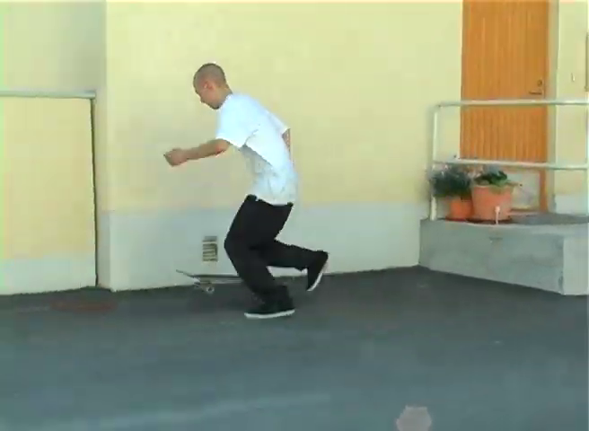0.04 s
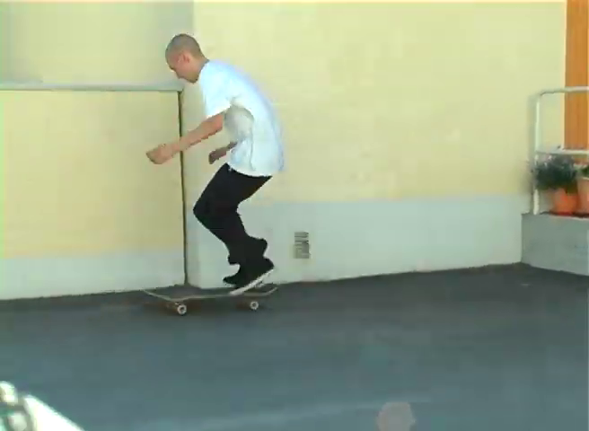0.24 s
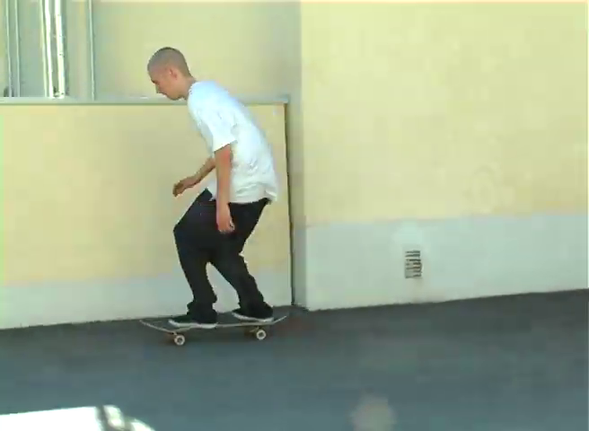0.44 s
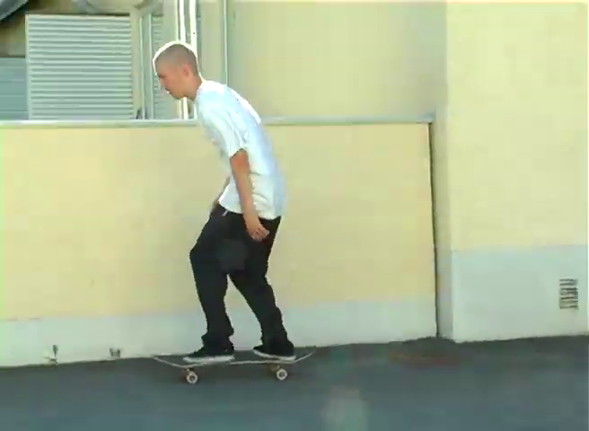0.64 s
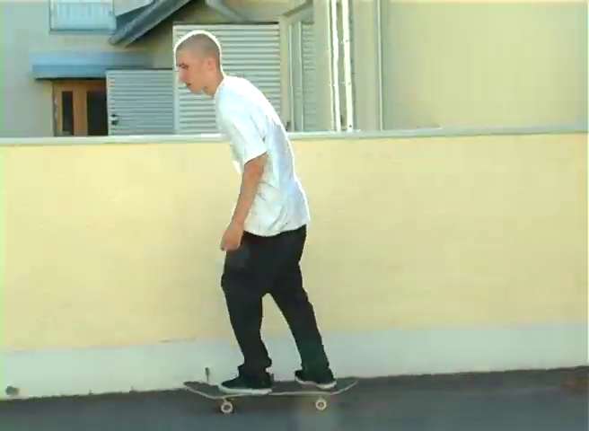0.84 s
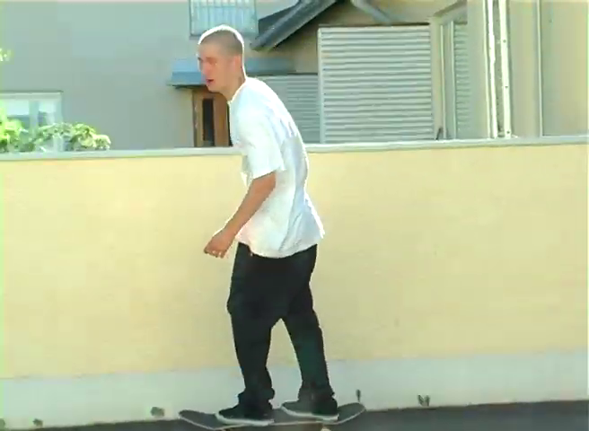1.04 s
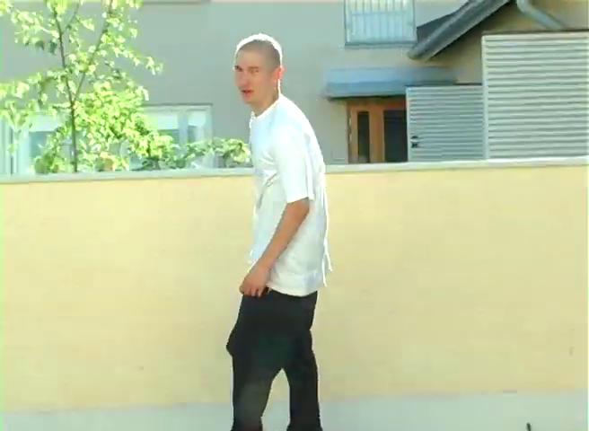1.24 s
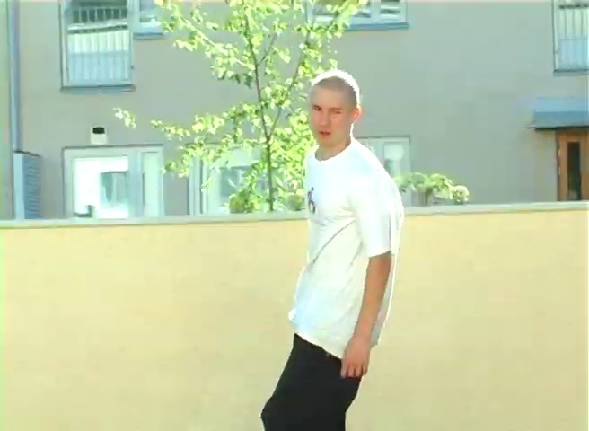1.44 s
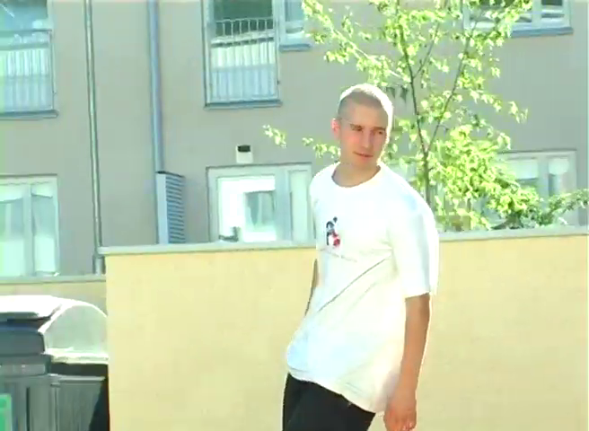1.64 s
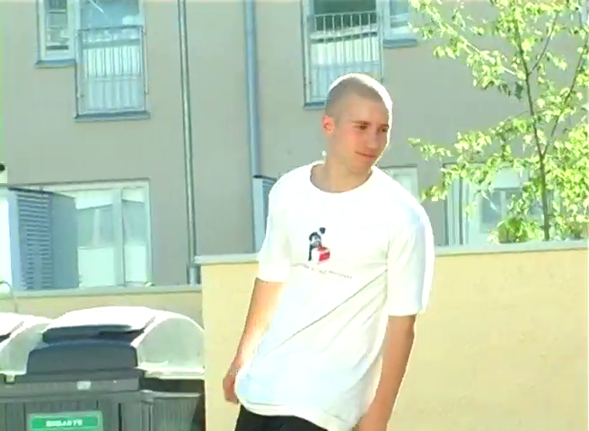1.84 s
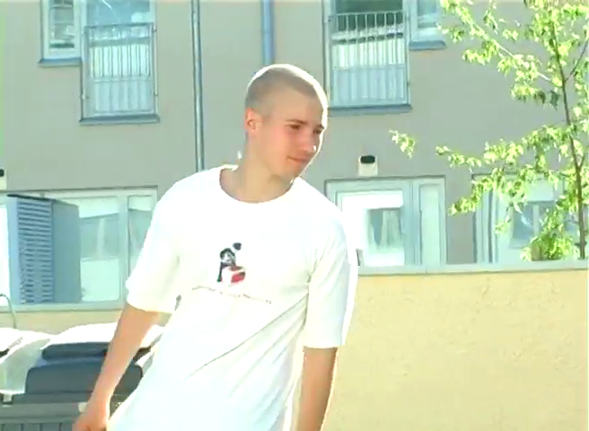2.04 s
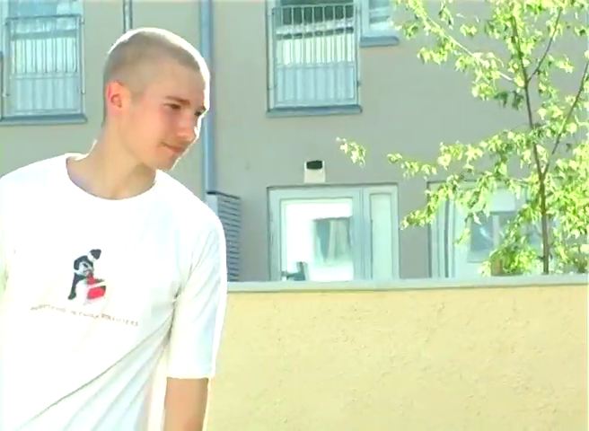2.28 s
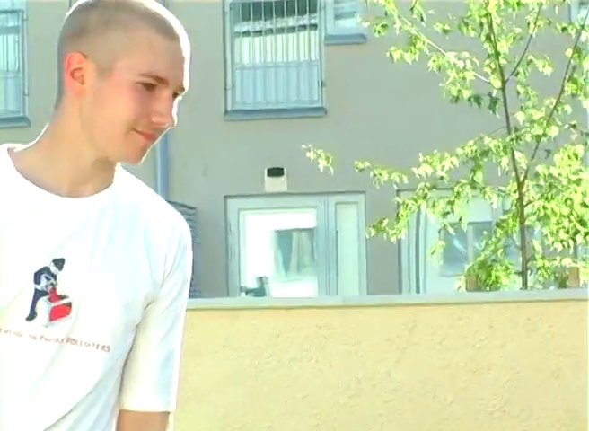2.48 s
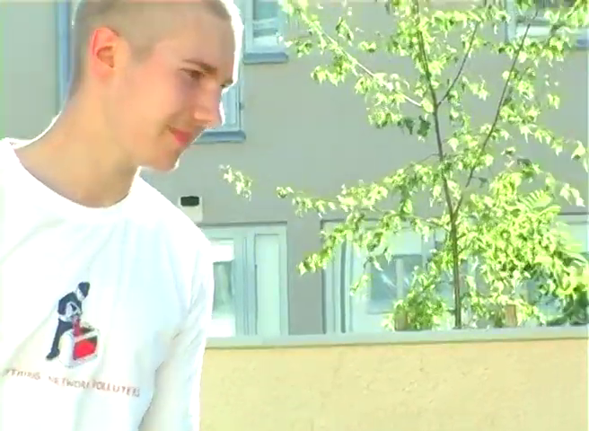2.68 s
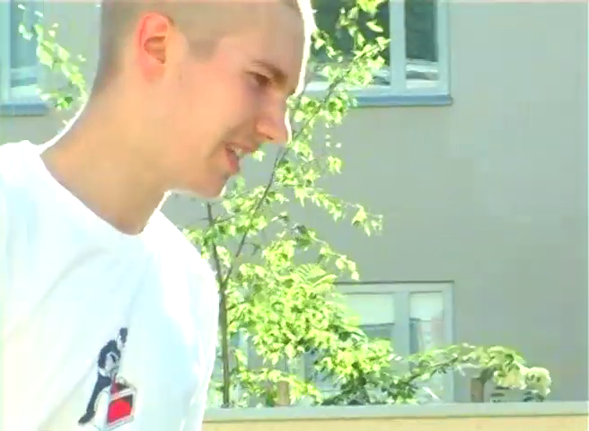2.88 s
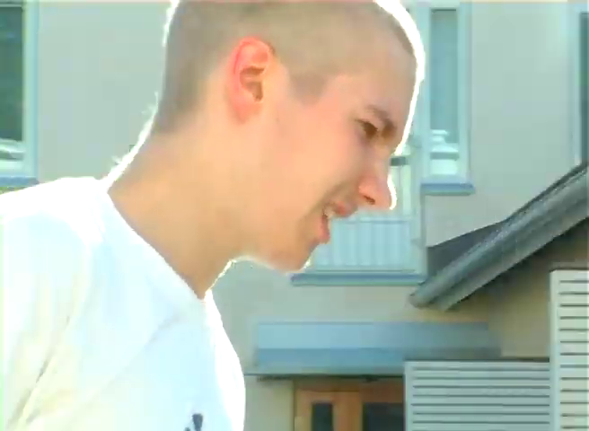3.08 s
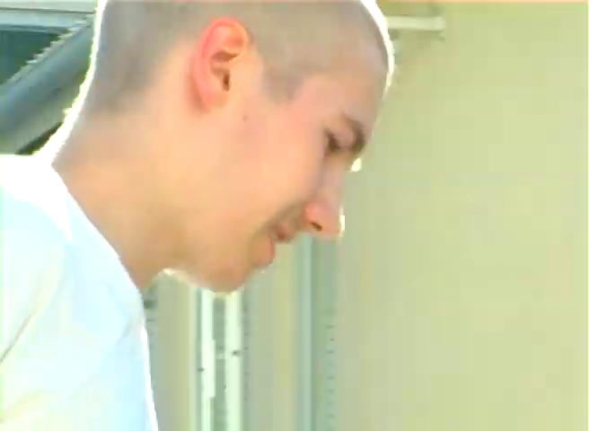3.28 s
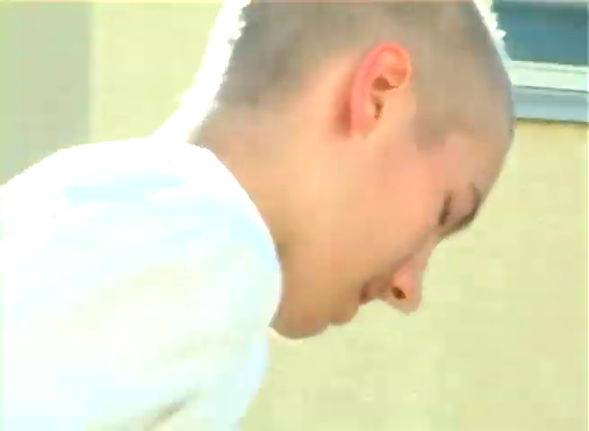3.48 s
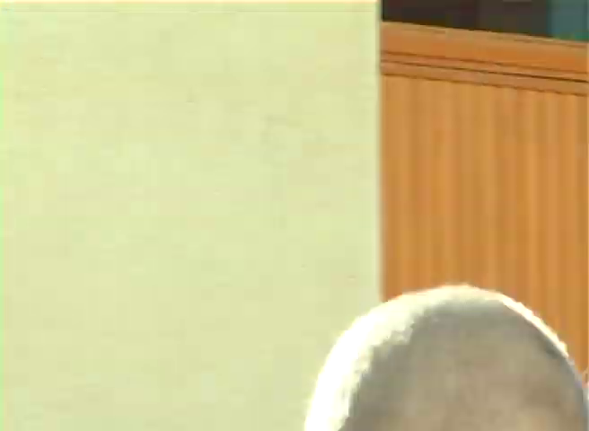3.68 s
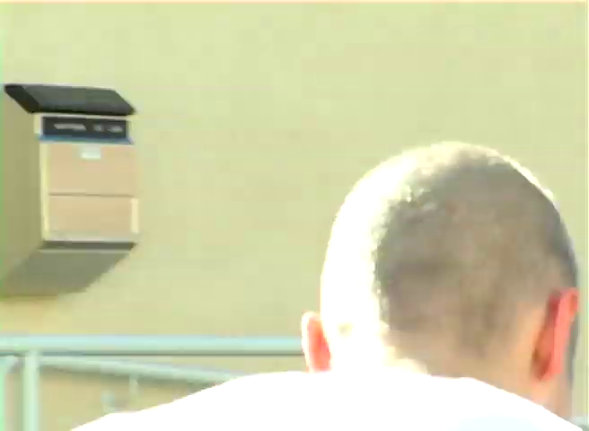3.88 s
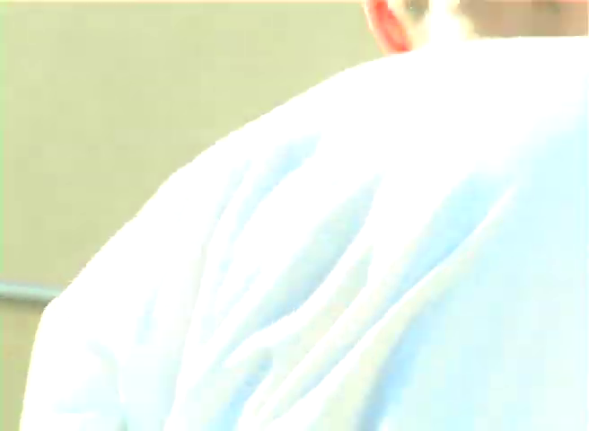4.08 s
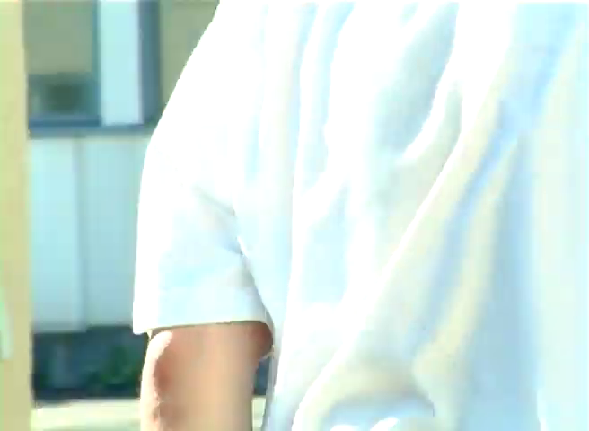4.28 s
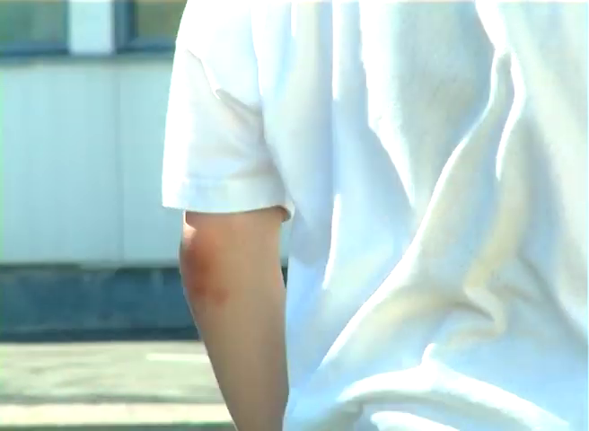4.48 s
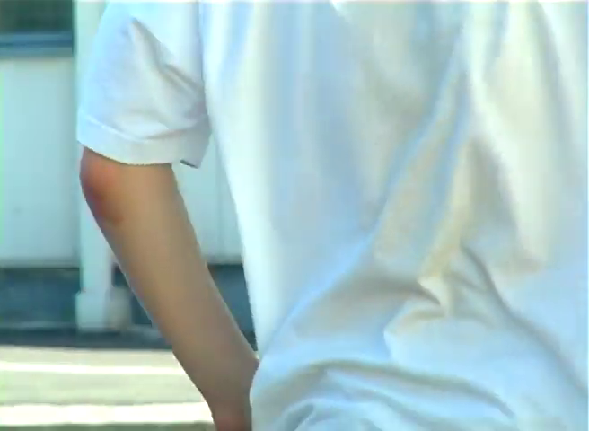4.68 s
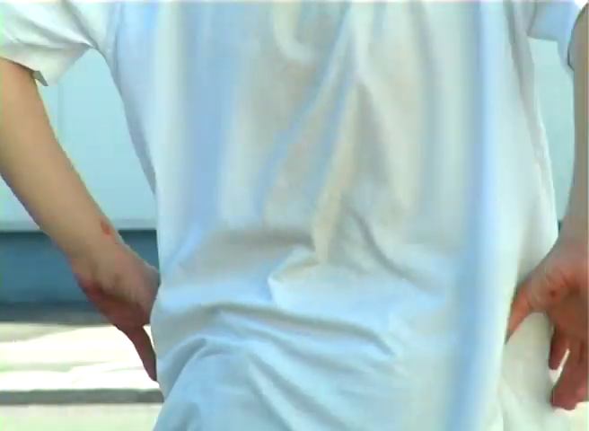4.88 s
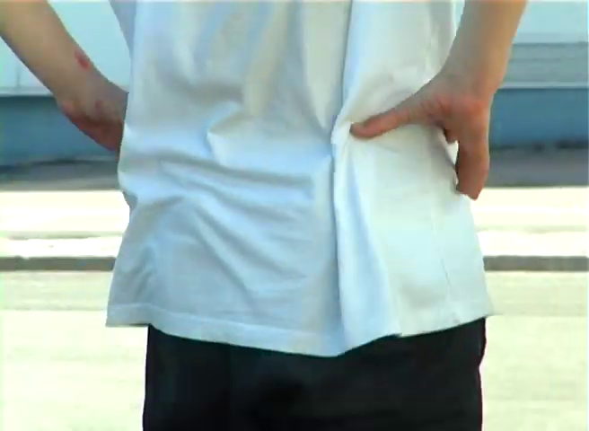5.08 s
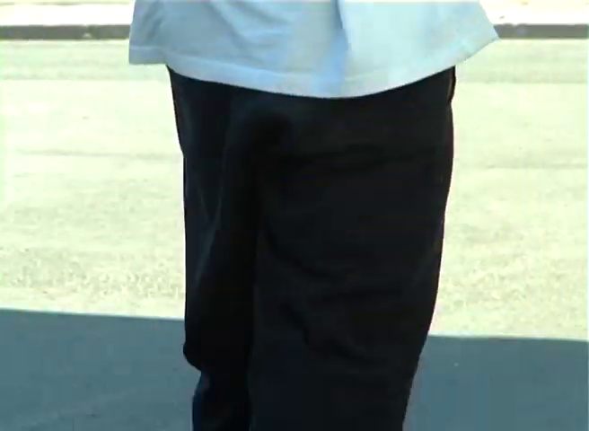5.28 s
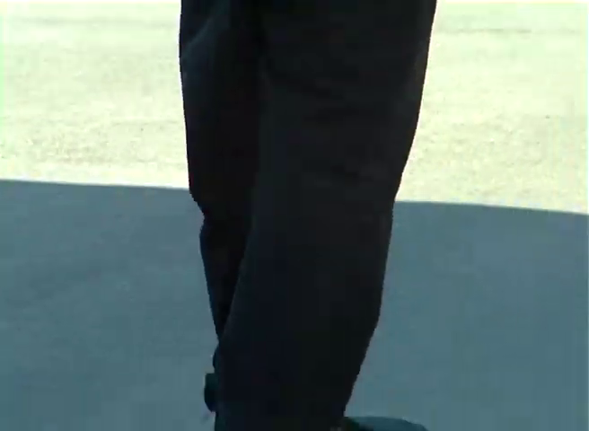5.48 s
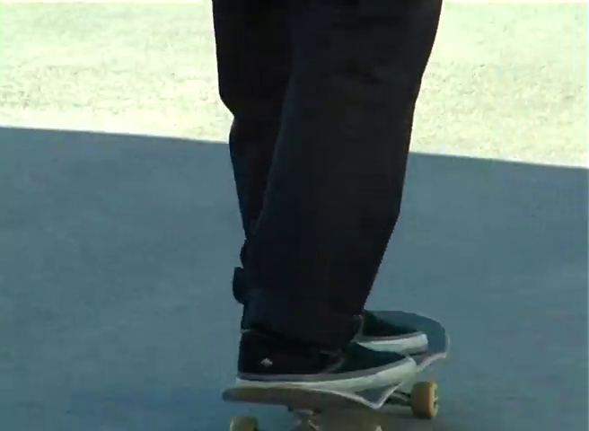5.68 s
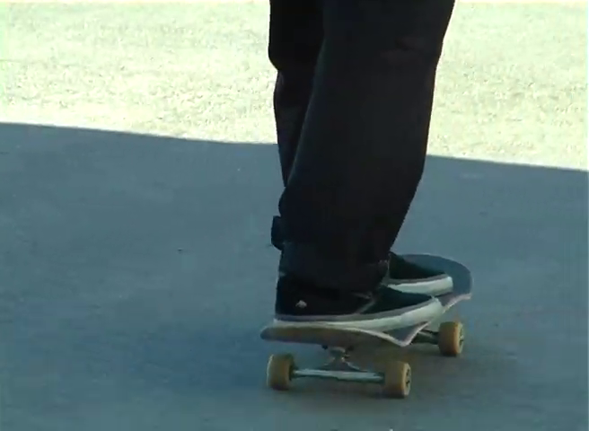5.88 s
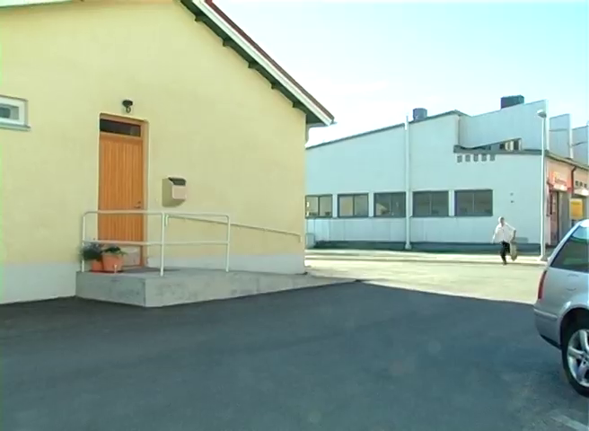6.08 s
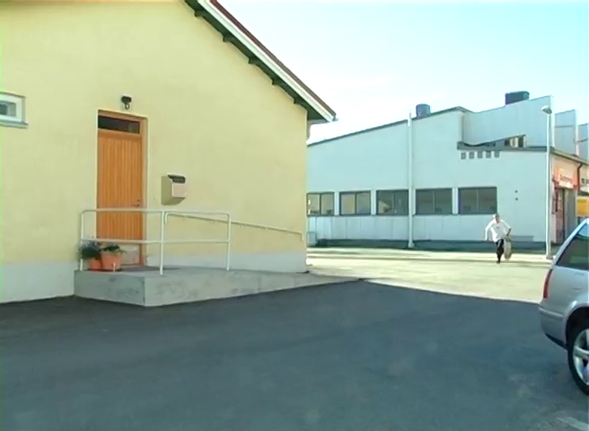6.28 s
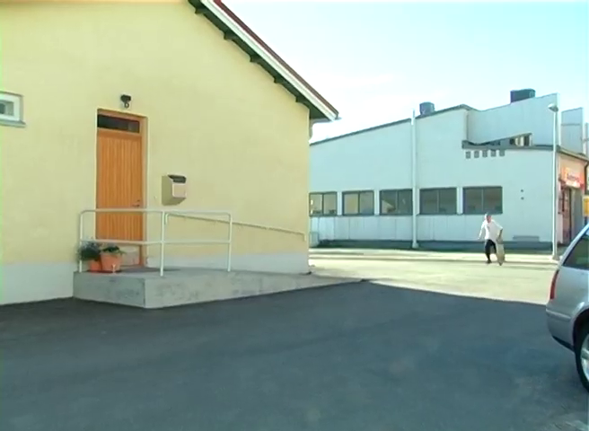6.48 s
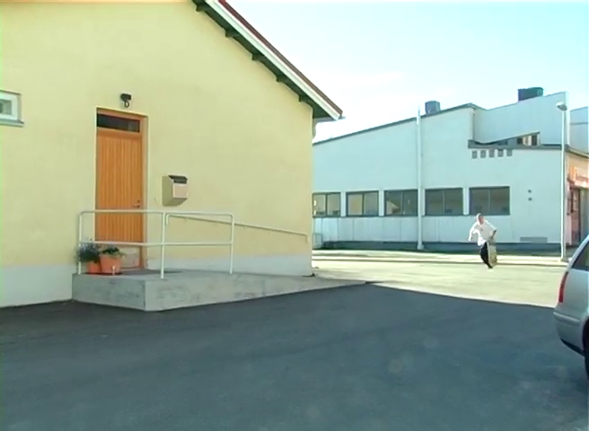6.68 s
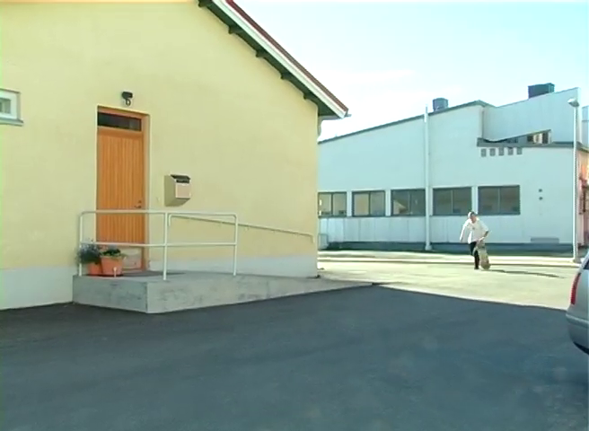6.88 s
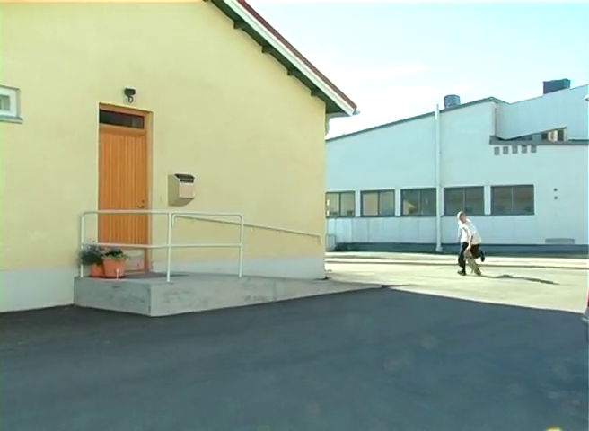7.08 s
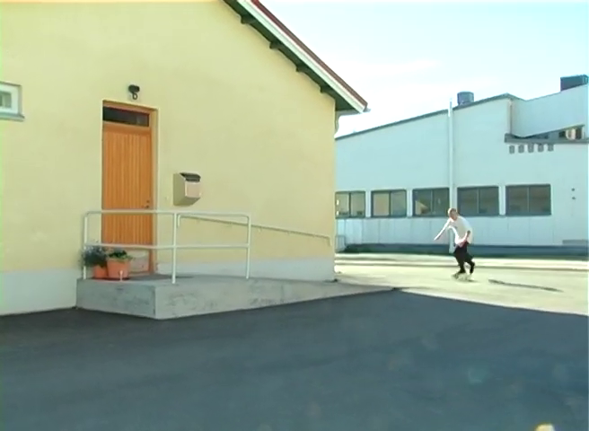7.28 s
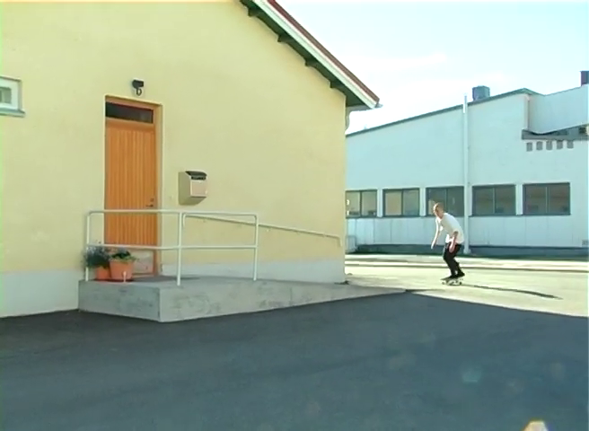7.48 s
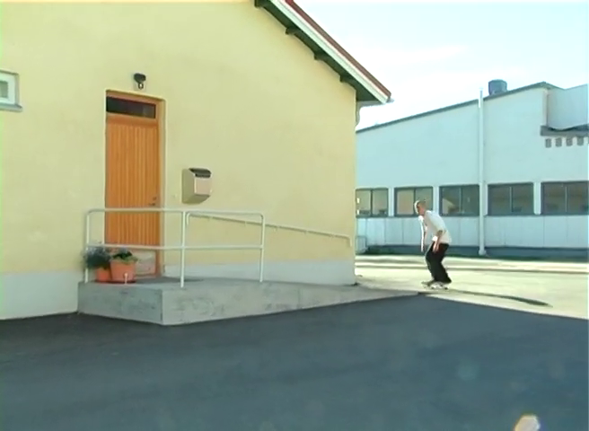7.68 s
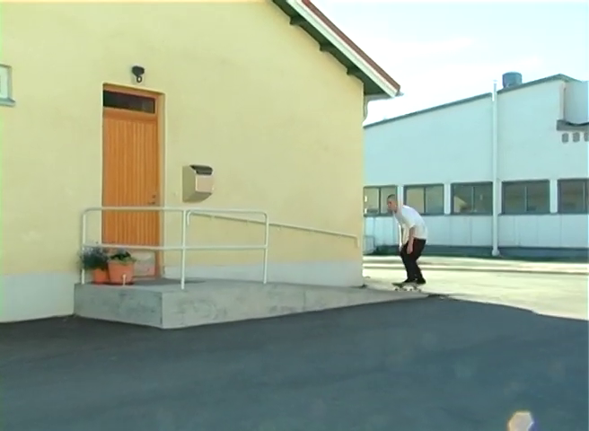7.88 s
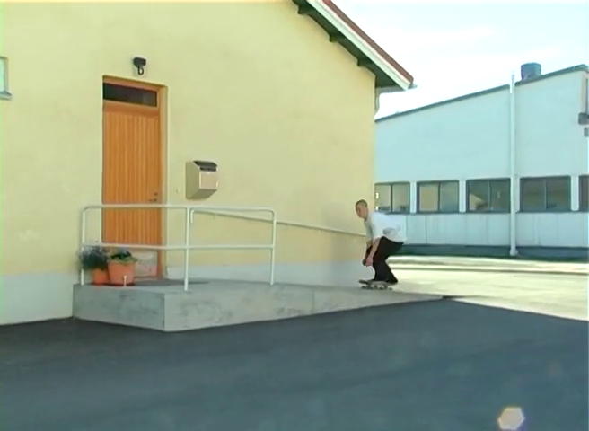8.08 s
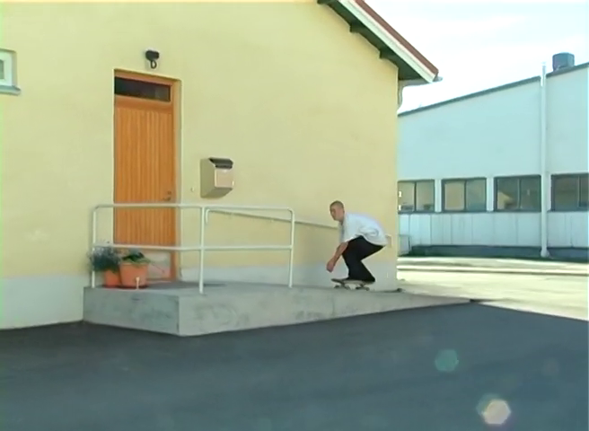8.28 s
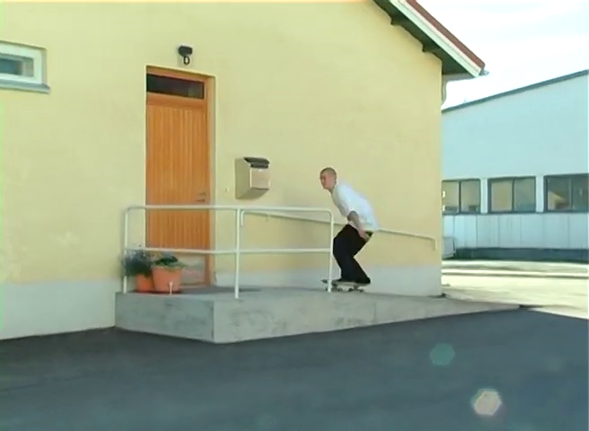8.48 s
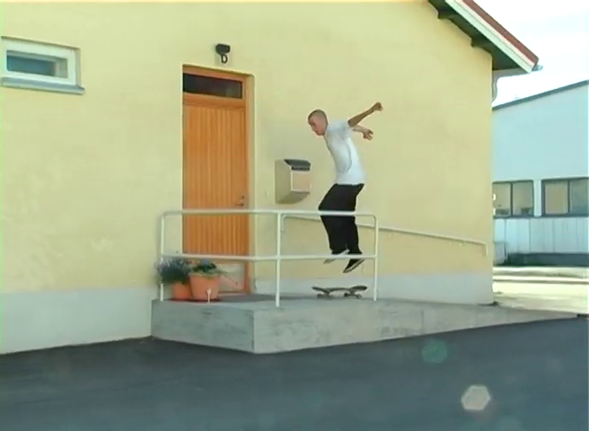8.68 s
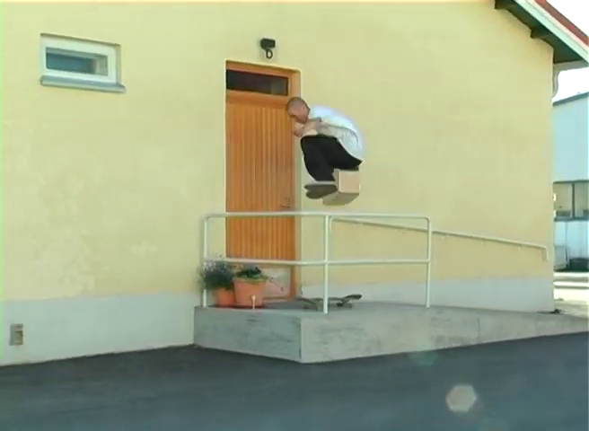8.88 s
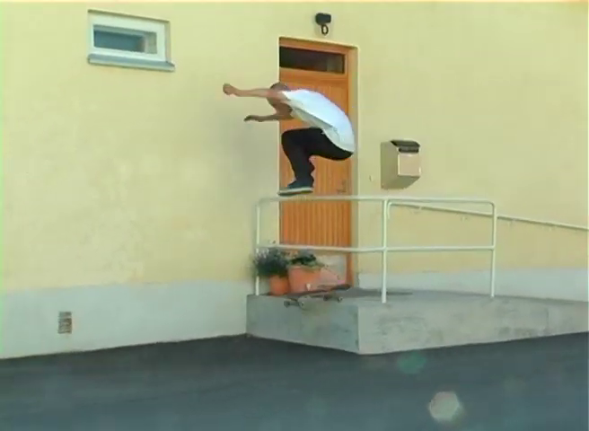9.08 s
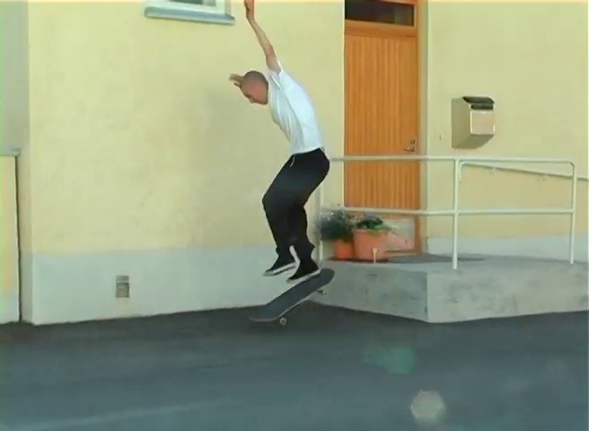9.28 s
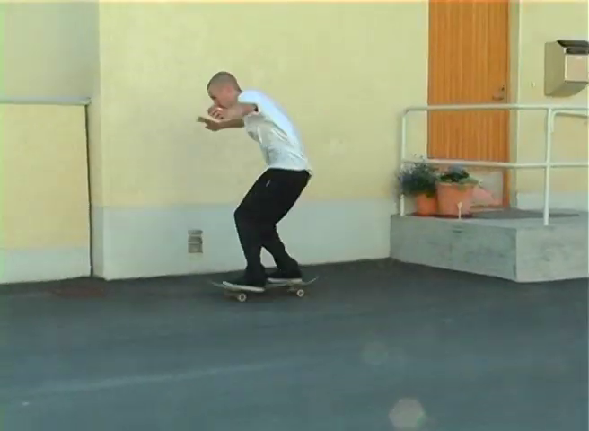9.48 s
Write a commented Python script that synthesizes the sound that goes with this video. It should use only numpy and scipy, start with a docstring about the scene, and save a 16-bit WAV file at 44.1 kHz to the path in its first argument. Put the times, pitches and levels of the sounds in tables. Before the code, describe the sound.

A skateboard clatters, rolls close past over rough asphalt, then rolls up again from afar and lands a jump hard.

```python
"""A skateboard in a yard, over the steady hum of distant traffic. First the rider jumps on, and house
walls echo the clatter. Rough asphalt shakes the deck (the wooden board) and crackles under the wheels
as he rolls close past and away. At 6 seconds the rolling stops suddenly. After a quiet moment he drops
the board far off and rolls up. He jumps, the board runs on alone, and at 9.4 seconds he lands on it hard."""
import sys
import numpy as np
from scipy import signal
from scipy.fft import rfft, irfft, next_fast_len
from scipy.io import wavfile
from scipy.ndimage import map_coordinates

SR = 44100
rng = np.random.default_rng(int(sys.argv[2]) if len(sys.argv) > 2 else 0)


def output_pcm(signal):
    """Save a mono or channel-first signal as 16-bit PCM at the path in sys.argv[1].

    Samples are clipped to [-1, 1] before scaling.
    """
    pcm = np.clip(np.atleast_2d(signal).T, -1, 1) * 32767
    wavfile.write(sys.argv[1], SR, np.round(pcm).astype(np.int16))


N = 420713
TIME = np.arange(N) / SR

# Where the board is. Each row: time in seconds, closeness in steps
# (-2 far end, -1 across the yard, 0 a little way off, 1 near, 2 right below the listener).
CLOSENESS = [(1.2, 0.21), (2.4, 0.85), (3.15, 1.7), (3.7, 2.2), (4.0, 1.18), (5.0, 0.58), (6.0, 0.37),
             (6.1, -2.2), (7.4, -1.37), (8.7, -0.97), (9.4, 1.18)]
# When the wheels roll. Each row: start, end and fade time, all in seconds.
ROLLS = [(0, 6.012, .004), (7.39, 9.18, .045), (9.43, 9.54, .045)]
# How hard the asphalt shakes the board. Each row: time in seconds, level in dB.
SHAKE_FIRST_PASS = [(0.0, -33.5), (0.34, -40), (0.47, -37.5), (0.88, -37.5), (1.42, -32), (2.57, -31.5),
                    (3.08, -34.5), (3.5, -36.5), (3.88, -31), (3.98, -32.5), (4.9, -36), (5.09, -38.5),
                    (5.45, -40), (5.83, -37), (5.88, -37)]
SHAKE_RUN_UP = [(7.48, -40.5), (7.576, -36), (7.866, -35), (8.562, -41.5), (8.702, -41), (9.046, -44),
                (9.15, -43.5)]
SHAKE_AFTER_LANDING = [(9.43, -42), (9.54, -38)]
# The jump. Each row: time in seconds, how empty the board is (0 ridden, 1 alone).
RIDER_OFF = [(8.66, 0.055), (8.72, 0.57), (9.38, 0.78), (9.41, 0.12)]
# Brief swells and dips in the roll. Each row: middle in seconds, length in seconds, change in dB.
WEIGHT_SHIFTS = [(0.11, 0.17, -31), (2.92, 0.078, -1), (3.22, 0.19, 1), (3.63, 0.22, -12.5),
                 (4.65, .3, 4.5)]  # the rider presses down or lifts
SIDEWAYS_SCRUBS = [(0.25, 0.28, 6.5), (2.05, .75, 4.5), (2.82, 0.51, 5.5), (3.98, 1, 5.5), (5.35, 0.3, 3.5)]  # the wheels slide sideways
COARSE_GROUND = [(3.49, 0.22, 4.5), (3.77, 0.12, 3), (5.12, 0.025, 6.5), (5.28, 0.068, 3), (7.88, 0.095, 3),
                 (9.1, 0.11, 4.5)]  # rougher asphalt makes the deck surge

# Tone colours of the steady sounds. Each row: frequency in Hz, relative level in dB.
DECK_ACROSS_YARD = [(260, -12), (310, -7.5), (400, -1.5), (490, 2), (570, -2.5), (670, -3.5), (750, -11),
                    (860, -13), (970, -1.5), (1100, -8.5), (1220, -21), (1300, -8), (1430, -23),
                    (1550, -14), (1720, -26), (1920, -19), (2200, -47)]
DECK_MIDWAY = [(300, -12), (420, 4), (505, 3), (570, 1), (650, -4.5), (750, -13.5), (870, -3.5),
               (985, -4.5), (1080, -8.5), (1200, -20.5), (1280, -6), (1410, -13), (1540, -8), (1740, -18.5),
               (1890, -8), (2200, -38.5)]
DECK_NEAR = [(180, -30.5), (300, -5.5), (408, -1.5), (491, 3.5), (547, 5), (594, -4), (673, 0), (872, -11),
             (948, 0.5), (1050, 3.5), (1140, -3), (1230, -7), (1630, -7.5), (2130, -18.5), (2200, -36),
             (2860, -49), (4840, -120)]
DECK_FROM_ABOVE = [(180, -52), (300, -13), (363, -9), (422, -11), (507, 1.5), (599, -3), (662, 2), (702, 3),
                   (872, -21), (1050, -7.5), (1210, -10.5), (1300, -8), (1640, -20), (1970, -12),
                   (2200, -35), (2860, -64), (4840, -120)]
DECK_EMPTY = [(300, -3), (370, -37), (440, 4), (500, 3), (580, -4), (660, 2.5), (730, -22.5), (800, 1),
              (880, -15), (990, -10.5), (1220, -13.5), (1700, -35), (2200, -26)]
AIR_BOOM = [(70, -30), (110, -5.5), (150, -7.5), (185, -3.5), (230, 1.5), (265, -2.5), (310, -15),
            (380, -26.5)]
AIR_BOOM_NEAR = [(70, -32), (105, -13), (135, -3), (170, 1), (215, -1.5), (255, 2.5), (310, -12),
                 (380, -23)]
CRACKLE_FAR = [(1600, -23.5), (2000, 0.5), (2250, -0.5), (2650, 2.5), (3000, -1.5), (3400, 3.5), (3900, -5),
               (4500, -12.5), (5500, -9)]
CRACKLE_NEAR = [(1600, -17), (2200, -4), (2700, 0), (3300, 1), (4000, 1), (4600, -3.5), (5300, -4),
                (7000, -12)]
BEARING_HISS = [(4000, -15), (5200, -2.5), (5800, 3), (6300, 2), (7200, -5), (7800, -2.5), (8600, -4.5),
                (9500, -12.5), (10200, -12), (11200, -17.5), (12300, -7), (14000, -10.5), (16000, -22.5)]
TRAFFIC = [(12, -58), (20, -21), (57, -5.5), (76, -11), (103, -10.5), (147, -19.5), (217, -9.5),
           (302, -16.5), (377, -16.5), (433, -17.5), (774, -21.5), (889, -24), (1930, -33.5), (4200, -48),
           (15000, -55)]
# High notes of the maple layers. Each row: pitch in Hz, level in dB, seconds to fade by 60 dB.
PLY_NOTES = [(1360, -8.5, 0.04), (1620, -1, 0.067), (1887, -1, 0.1), (1840, -3, 0.072), (2300, -12, 0.11),
             (2447, 2, 0.1), (2633, 5, 0.031), (2890, -2, 0.05), (3110, -12, 0.027), (3450, 7, 0.03),
             (3756, 3.5, 0.05)]
# A motor's hum and a thin whine. Each row: pitch in Hz, level in dB.
STEADY_TONES = [(75.4, -64), (15624, -74)]

# Blows to the board. Each row: start in seconds, level in dB, rattle length in seconds.
FOOT_THUDS = [(0.022, -26.5, 0.011), (0.508, -32, 0.0096), (3.039, -15.5, 0.0075), (3.266, -29, 0.015),
              (3.314, -21.5, 0.0093), (3.46, -30, 0.012), (9.43, -14, 0.0033), (9.467, -20.5, .015),
              (9.513, -21.5, 0.0098)]  # feet and weight come down on the deck and axles
WOOD_SLAPS = [(0.062, -32, 0.016), (6.675, -59, 0.0085), (6.951, -58, .008), (7.184, -22.5, 0.019),
              (7.261, -24, 0.015), (9.363, -28.5, 0.012)]  # bare wood hits the ground
LANDING = [(9.379, -11.5, 0.008), (9.387, -12.5, 0.017), (9.407, -6.5, 0.011), (9.421, -13, .007)]  # the axles come down, then both feet
# Wheels drop or hit a crack.
# Each row: start in seconds, level in dB, extra brightness in dB, rattle length in seconds.
WHEEL_CLACKS = [(0.158, -24.5, 10, .016), (0.183, -17, 5.5, 0.027), (0.328, -22, 4, 0.021),
                (0.398, -10.5, -3.5, .011), (0.412, -20, 1.5, .008), (0.751, -28, -4.5, 0.0063),
                (3.651, -18.5, -4, 0.0079), (3.714, -14.5, 2.5, .009), (3.724, -24, 6, .012),
                (3.803, -18.5, -1, .008), (3.997, -27.5, 6, .006), (5.615, -28, 2, .005),
                (5.63, -26, 3.5, 0.019), (5.781, -25.5, 0, .007), (5.899, -22, -2, .02),
                (7.383, -27.5, 8, .006), (7.389, -20, -1, .034), (7.727, -33, -5, 0.013),
                (7.974, -22, -1, 0.027), (8.049, -24.5, -1.5, 0.016), (8.791, -38.5, 7.5, 0.011)]
# Low notes of the struck deck. Each row: multiple of its pitch, level in dB, seconds to fade by 60 dB.
DECK_NOTES = [(1.002, 5, 0.2), (1.27, -20, 0.2), (1.8, -4.5, 0.077), (2.0, -28, 0.02), (2.3, 1.5, 0.026)]
# Tone colours of a blow's noise. Each row: frequency in Hz, relative level in dB.
WOOD_KNOCK = [(280, -33.5), (420, -3), (520, 5), (660, 3), (780, -5.5), (1000, 2), (1250, -12.5),
              (1600, -40.5)]
WOOD_CRACK = [(800, -4), (1300, 2), (1700, -0.5), (1950, 3), (2250, -1), (2900, -1.5), (3400, 2),
              (3900, -9.5), (4500, -21), (6000, -17)]
METAL_CLICK = [(3500, -40), (4500, -3.5), (5200, -8), (6200, 4.5), (7200, -4), (8400, -1.5), (9600, -10.5),
               (11200, -14), (12600, -6.5), (14200, -10), (16000, -29)]
# The walls' echo. Each row: frequency in Hz, seconds to fade by 60 dB.
ECHO_TIMES = [(200, 0.78), (1000, 0.49), (4000, 0.35), (12000, 0.064)]
# Small stones snap under a wheel. Each row: start in seconds, level in dB.
STONE_SNAPS = [(0.273, -28), (0.5896, -33), (0.6372, -23.5), (1.3109, -22.5), (2.515, -17.5), (5.4151, -28),
               (8.868, -30), (9.135, -40)]
# Sound from the far end loses its highest treble in the air. Each row: frequency in Hz, gain in dB.
FAR_END_TONE = [(3500, 5), (7000, 5), (10000, -10), (15000, -18)]
# How alike the two ears' signals are. Each row: frequency in Hz, likeness (1 is identical).
STEREO_LIKENESS = [(100, 0.99), (500, 0.98), (1000, 0.92), (2000, 0.89), (4000, 0.87), (8000, 0.72),
                   (13000, 0.66)]
# The balance of the two sides. Each row: frequency in Hz, left level minus right level in dB.
STEREO_BALANCE = [(60, -2.5), (110, -2.0), (200, -1.5), (380, -2.0), (700, -1.5), (1290, -1.5),
                  (2380, -1.0), (4400, -1.5), (8120, -1.5), (15000, -3.5)]

# Loudness rules for the roll. Each lists: base level in dB, dB per dB of shaking,
# dB per step closer, dB added when the board is empty.
DRONE_RULE = (-33.5, 1, 0.5, -5.5)
BOOM_RULE = (-45, -0.07, 6.5, -17)
HISS_RULE = (-53, 0.54, 1.4, 6.5)
# Recipes for the blows. Each lists, in relative dB: air thump, deck, wood crack, metal.
WHEEL_MIX = (-18.5, -0.5, -9, -14)
THUD_MIX = (-3, -1, -12.5, -26)
SLAP_MIX = (-16, -8, -2, -20)
LANDING_MIX = (-10.5, 0.5, -5.5, -15)

EASY_ROLL_DB = -35.5  # the shaking at an easy pace
DRONE_PER_LOAD, HISS_PER_LOAD, CRACKLE_PER_SCRUB = 0.26, 0.3, 0.17  # dB per dB
DECK_HZ, OVERHEAD_RISE_HZ, PITCH_SCATTER = 511.4, 126, 0.059  # the deck rings higher heard from above
TRAFFIC_DB, TRAFFIC_SWAY_DB = -49, 0.8
PEAK_LIMIT, TOP_HZ = 0.85, 16000


def amp(db):
    """Turn decibels into a number to multiply by."""
    return 10 ** (np.asarray(db) / 20)


def unit(x):
    """Scale a signal so its average strength (rms) is 1."""
    return x / np.sqrt(np.mean(x ** 2) + 1e-20)


def along(points, hz):
    """Read a table of frequencies and values, sliding between rows by musical pitch."""
    freqs, values = np.transpose(points)
    return np.interp(np.log(hz + 1), np.log(freqs + 1), values)


def wobble(rate):
    """A smooth curve through `rate` random values a second."""
    return map_coordinates(rng.standard_normal(int(N * rate / SR) + 4), [TIME * rate])


def swells(rows):
    """A dB curve with one smooth hill or dip for each row."""
    return sum(db * np.exp(-(2 * (TIME - s) / length) ** 2) for s, length, db in rows)


def closeness_at(s):
    """How close the board is at s seconds."""
    return np.interp(s, *np.transpose(CLOSENESS))


def filtered(x, response):
    """Multiply each frequency in x by response(hz)."""
    n = x.shape[-1]
    size = next_fast_len(n + 4096)
    return irfft(rfft(x, size) * response(np.fft.rfftfreq(size, 1 / SR)), size)[..., :n]


def coloured(x, spectrum, size=4096):
    """Give x a table's tone colour, falling steeply outside the table's range."""
    hz = np.fft.rfftfreq(size, 1 / SR) + 1
    edges = np.minimum(1, hz / spectrum[0][0]) ** 3 * np.minimum(1, spectrum[-1][0] / hz) ** 3
    cepstrum = irfft(np.log(amp(along(spectrum, hz)) * edges + 1e-6))
    # folding this in half makes the filter ring after a hit, never before it
    cepstrum[1:size // 2] *= 2
    cepstrum[size // 2 + 1:] = 0
    tap_response = irfft(np.exp(rfft(cepstrum)))
    return signal.fftconvolve(x, tap_response[None], axes=1)[:, :x.shape[-1]]


def stereo(pair):
    """Turn two unrelated signals into left and right, most alike in the bass."""
    angle = lambda hz: np.arccos(np.clip(along(STEREO_LIKENESS, hz), -1, 1)) / 2
    mid, side = filtered(pair, lambda hz: np.array([np.cos(angle(hz)), np.sin(angle(hz))]))
    return np.array([mid + side, mid - side])


def add(track, s, sound):
    """Mix a sound into the track, starting at s seconds."""
    part = track[:, max(0, round(s * SR)):][:, :sound.shape[-1]]
    part += sound[..., :part.shape[-1]]


def ringing(notes, t):
    """Tapped wood rings with fading notes, a little different at every spot."""
    return sum(amp(db + 2 * rng.standard_normal() - 60 * t / fade)
               * np.sin(2 * np.pi * hz * t * (1 + 0.0089 * rng.standard_normal()))
               for hz, db, fade in notes)


def asphalt(tips_per_second, scatter_db, texture):
    """The push on the wheels: stone tips of unequal size, over a fine texture."""
    sizes = amp(scatter_db * np.minimum(rng.standard_normal(N), 2.5))
    hits = rng.random(N) < tips_per_second / SR
    tips = unit(sizes * hits * rng.standard_normal((2, N)))
    return unit(stereo(tips + texture * rng.standard_normal((2, N))))


def deck_drone(bumps, closeness, empty):
    """Bumps make the deck drone; its tone changes with distance and when the rider is off."""
    views = [(-1, DECK_ACROSS_YARD), (0, DECK_MIDWAY), (1, DECK_NEAR), (2, DECK_FROM_ABOVE)]
    ridden = sum(np.maximum(0, 1 - abs(closeness - step)) * unit(coloured(bumps, colour))
                 for step, colour in views)
    return (1 - empty) * ridden + empty * unit(coloured(bumps, DECK_EMPTY))


def air_boom(bumps, near):
    """The shaking deck moves the air beneath it: a hollow boom."""
    return (1 - near) * unit(coloured(bumps, AIR_BOOM)) + near * unit(coloured(bumps, AIR_BOOM_NEAR))


def ply_ring(force):
    """A force sets the deck's layers of wood ringing with high notes."""
    tap_response = ringing(PLY_NOTES, np.arange(SR // 10) / SR)
    return signal.fftconvolve(force, tap_response[None], axes=1)[:, :force.shape[-1]]


def wheel_crackle(grit, near):
    """Hard plastic wheels crackle on stone; farther off, ringing wood is part of the sound."""
    far_crackle = unit(unit(coloured(grit, CRACKLE_FAR)) + 0.58 * unit(ply_ring(grit)))
    return (1 - near) * far_crackle + near * unit(coloured(grit, CRACKLE_NEAR))


def bearing_hiss(grit):
    """The wheel bearings give a high, fluttering hiss."""
    return amp(2.5 + 0.98 * wobble(rate=100)) * unit(coloured(grit, BEARING_HISS))


def rolling():
    """Drone, boom, crackle and hiss follow the ground, the rider's weight and the distance."""
    closeness = np.clip(closeness_at(TIME), -1, 2)
    near = np.clip(closeness, 0, 1)
    empty = np.interp(TIME, *np.transpose(RIDER_OFF))
    shake_rows = np.vstack([SHAKE_FIRST_PASS, SHAKE_RUN_UP, SHAKE_AFTER_LANDING])
    shake_db = np.interp(TIME, *shake_rows.T) - EASY_ROLL_DB
    grounded = sum((TIME >= start) * np.exp(-np.maximum(TIME - end, 0) / fade)
                   for start, end, fade in ROLLS)

    def level_db(base_db, per_shake, closer_db, empty_db):
        return base_db + per_shake * shake_db + closer_db * np.maximum(closeness, 0) + empty_db * empty

    load_db, scrub_db = swells(WEIGHT_SHIFTS), swells(SIDEWAYS_SCRUBS)
    drone_gain = grounded * amp(level_db(*DRONE_RULE) + swells(COARSE_GROUND) + DRONE_PER_LOAD * load_db)
    boom_gain = grounded * amp(level_db(*BOOM_RULE) + load_db)
    hiss_gain = grounded * amp(level_db(*HISS_RULE) + scrub_db + HISS_PER_LOAD * load_db)
    # the crackle grows with both the drone and the hiss
    crackle_gain = drone_gain ** 0.27 * hiss_gain ** 0.74
    crackle_gain *= amp(-2 + 0.87 * near + CRACKLE_PER_SCRUB * scrub_db)
    bumps = asphalt(tips_per_second=3000, scatter_db=1.5, texture=0.74)
    grit = asphalt(tips_per_second=1400, scatter_db=3.5, texture=1.0)
    treble = crackle_gain * wheel_crackle(grit, near) + hiss_gain * bearing_hiss(grit)
    patches = wobble(rate=45)  # coarse and smooth spots pass under the wheels
    drone_gain *= amp(0.95 * patches + 0.84 * wobble(rate=16))
    return (drone_gain * deck_drone(bumps, closeness, empty)
            + boom_gain * amp(0.78 * patches) * air_boom(bumps, near)
            + amp(1.48 * patches) * treble)


def background():
    """Far traffic rumbles under a motor's low hum; a thin, steady whine sounds high above it all."""
    traffic = unit(coloured(stereo(rng.standard_normal((2, N))), TRAFFIC))
    traffic *= amp(TRAFFIC_DB + TRAFFIC_SWAY_DB * wobble(rate=6))
    tones = sum(np.sqrt(2) * amp(db) * np.sin(2 * np.pi * hz * TIME + 0.34 * wobble(rate=2.6))
                for hz, db in STEADY_TONES)
    return traffic + tones


def blow(s, rattle, mix, bright_db=0):
    """One blow rings the deck, thumps the air under it and rattles the wood and metal axles."""
    thump_db, deck_db, crack_db, metal_db = mix
    t = np.arange(SR // 5) / SR
    same_energy = lambda x: x / np.sqrt(np.mean(np.sum(x ** 2, axis=-1)) / (0.01 * SR))
    overhead = np.clip(closeness_at(s) - 1, 0, 1)
    pitch_hz = (DECK_HZ + OVERHEAD_RISE_HZ * overhead) * (1 + PITCH_SCATTER * rng.standard_normal())
    # loose parts chatter for a moment, then die away fast
    age = t / rattle
    attack = 1 - np.exp(-t / 0.00026)
    chatter = attack * (np.exp(-age ** 2) + amp(-16 - 60 * t / 0.17))
    force = lambda: stereo(rng.standard_normal((2, len(t)))) * chatter
    burst = lambda colour: same_energy(coloured(force(), colour))
    # feet and the axles' rubber cushions choke the ring once the rattle is over
    notes = [(ratio * pitch_hz, db, fade) for ratio, db, fade in DECK_NOTES]
    ring = same_energy(ringing(notes, t) * np.exp(-(age / 2) ** 2))
    deck = amp(deck_db - 6) * ring + amp(deck_db - 5) * burst(WOOD_KNOCK)
    thump = amp(thump_db - 3) * burst(AIR_BOOM)
    high_ring = ply_ring(force() * np.exp(-t / 0.0025)) * np.exp(-(age / 3) ** 2)
    crack = amp(crack_db) * same_energy(burst(WOOD_CRACK) + 0.57 * same_energy(high_ring))
    metal = amp(metal_db) * burst(METAL_CLICK)
    return deck + thump + amp(bright_db - 3) * (crack + metal)


def clatter():
    """Wheels, feet and bare wood strike, each kind of blow with its own recipe."""
    track = np.zeros((2, N))
    for s, db, bright_db, rattle in WHEEL_CLACKS:
        add(track, s, amp(db) * blow(s, rattle, WHEEL_MIX, bright_db))
    for rows, mix in [(FOOT_THUDS, THUD_MIX), (WOOD_SLAPS, SLAP_MIX), (LANDING, LANDING_MIX)]:
        for s, db, rattle in rows:
            add(track, s, amp(db) * blow(s, rattle, mix))
    return track


def wall_echo(x):
    """House walls throw the sound back; the high notes die away first."""
    hz, t, noise = signal.stft(rng.standard_normal((2, SR // 2)), SR, nperseg=256)
    fading = noise * amp(-60 * t / along(ECHO_TIMES, hz)[:, None])
    tail = stereo(signal.istft(fading, SR, nperseg=256)[1])
    tail = np.pad(tail, ((0, 0), (round(0.011 * SR), 0)))  # the echo starts 11 ms late
    return signal.fftconvolve(x, tail / np.linalg.norm(tail[0]), axes=1)[:, :N]


def stone_snaps():
    """Grains of gravel snap under a wheel, each with a short, bright tick."""
    track = np.zeros((2, N))
    t = np.arange(SR // 20) / SR
    for s, db in STONE_SNAPS:
        snap = stereo(rng.standard_normal((2, len(t)))) * amp(-60 * t / 0.038)
        tick = coloured(snap, METAL_CLICK)
        add(track, s, amp(db - 4.5) * tick / np.abs(tick).max())
    return track


def scene():
    """The board in its yard: the farther off it is, the duller it sounds and the more its blows echo."""
    closeness = closeness_at(TIME)
    blows = clatter() + stone_snaps()
    echo_db = -18.5 - 1.6 * np.maximum(closeness, -1)
    board = rolling() + blows + wall_echo(amp(echo_db) * blows)
    far_share = np.clip(-1 - closeness, 0, 1)
    far_board = filtered(board, lambda hz: amp(along(FAR_END_TONE, hz)))
    return (1 - far_share) * board + far_share * far_board + background()


def record(dry):
    """Make the right side a little louder, round off the hardest peaks and cut the highest treble."""
    heard = filtered(dry, lambda hz: amp(np.outer([.5, -.5], along(STEREO_BALANCE, hz))))
    rounded = heard / (1 + (heard / PEAK_LIMIT) ** 6) ** (1 / 6)
    return filtered(rounded, lambda hz: hz < TOP_HZ)


dry = scene()
out = record(dry)
output_pcm(out)
```